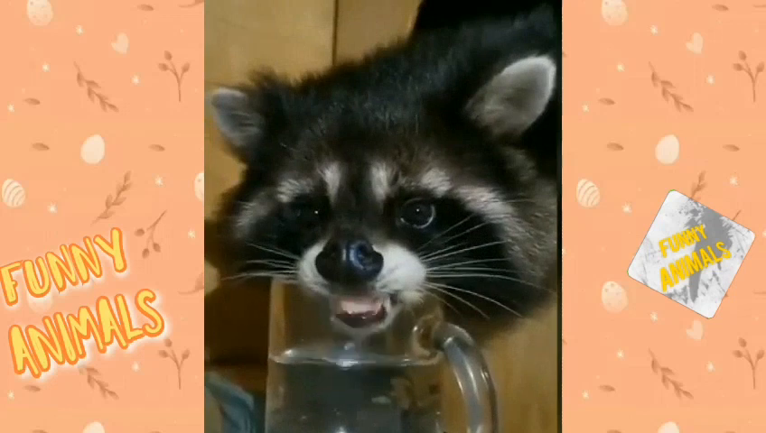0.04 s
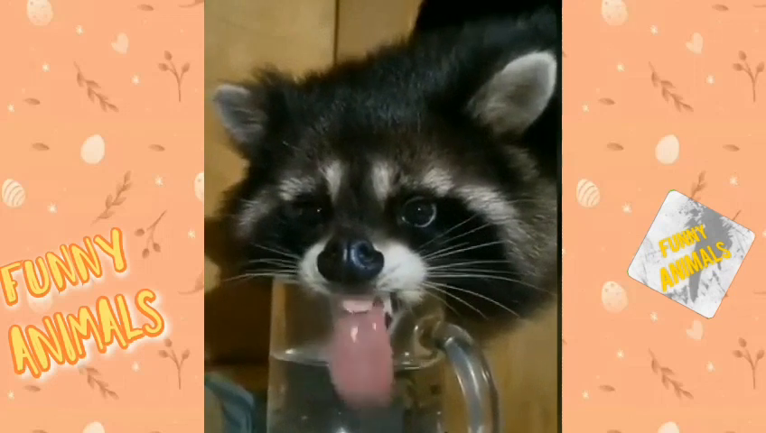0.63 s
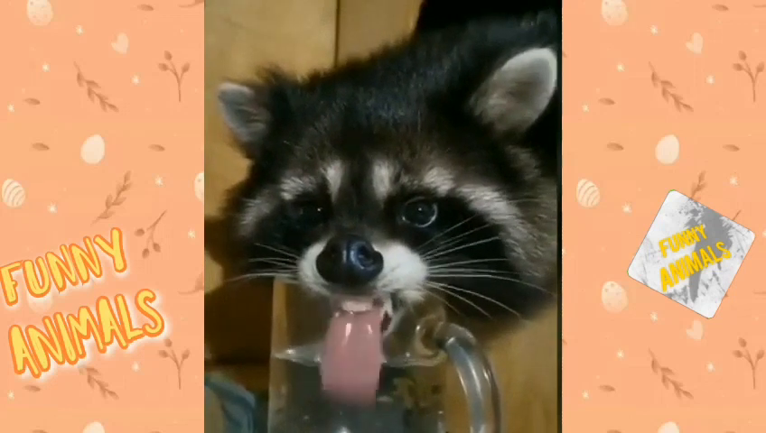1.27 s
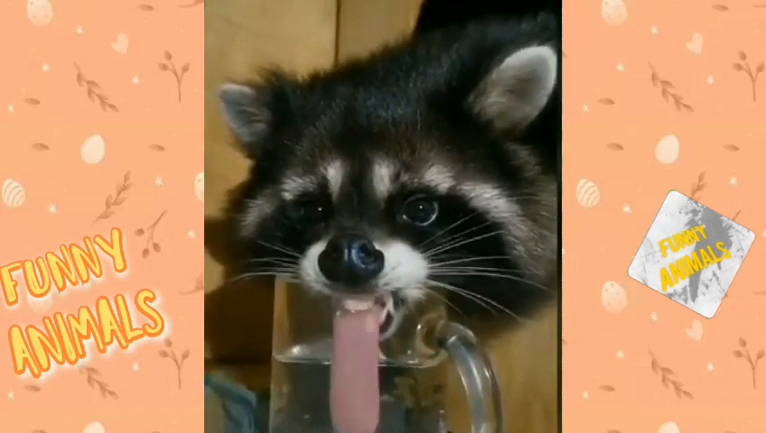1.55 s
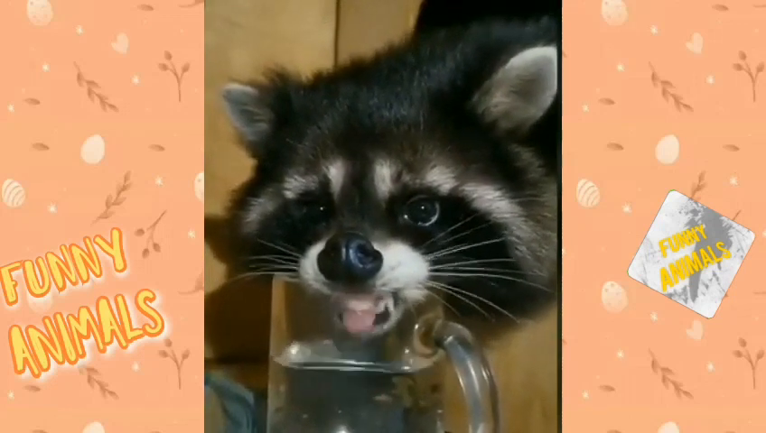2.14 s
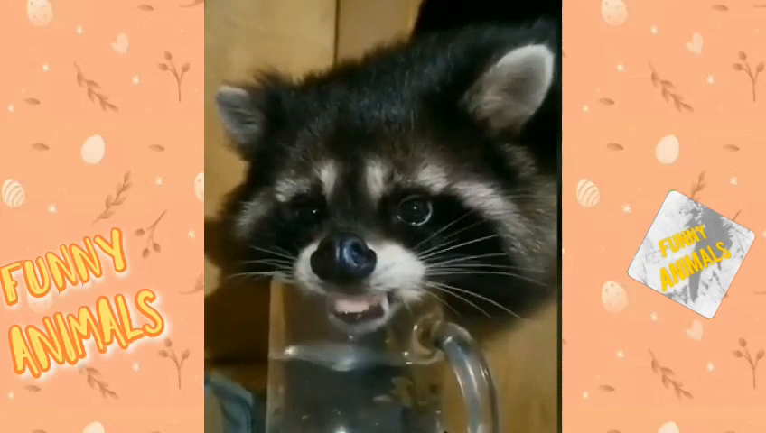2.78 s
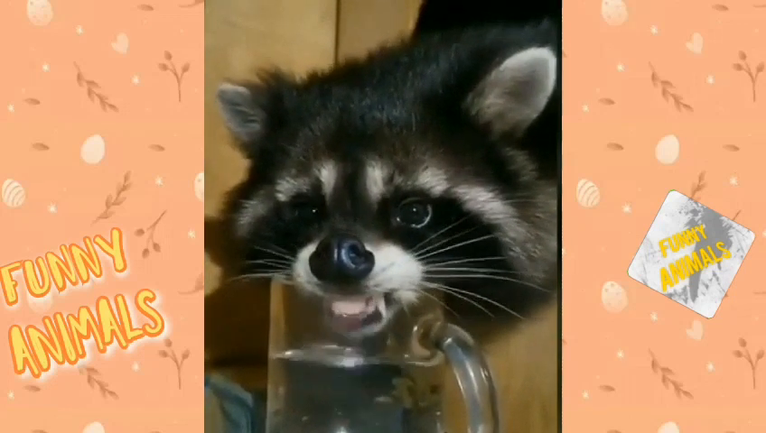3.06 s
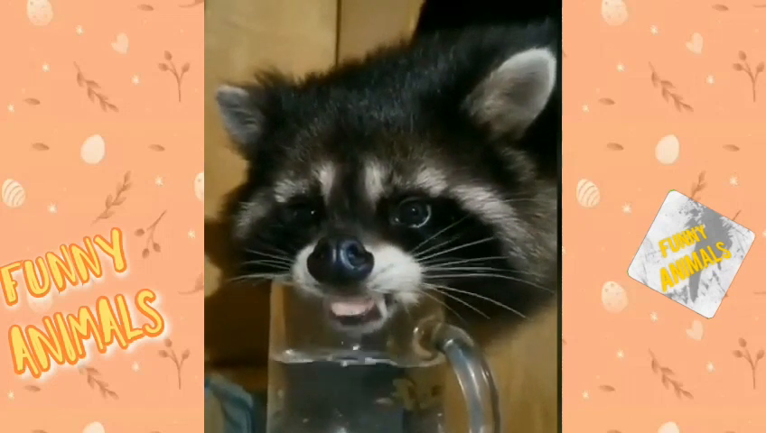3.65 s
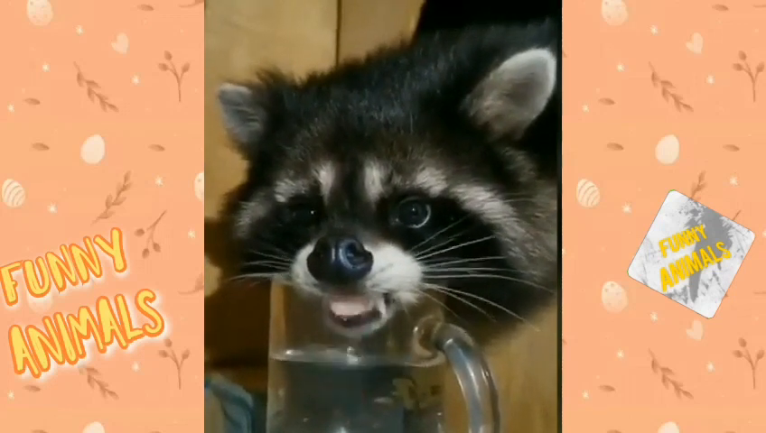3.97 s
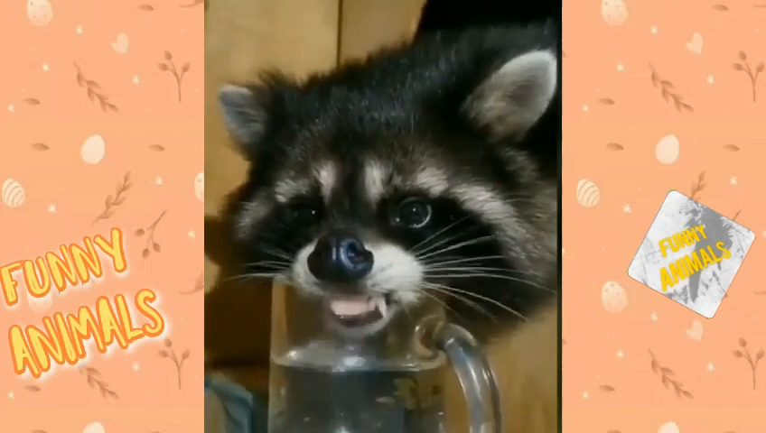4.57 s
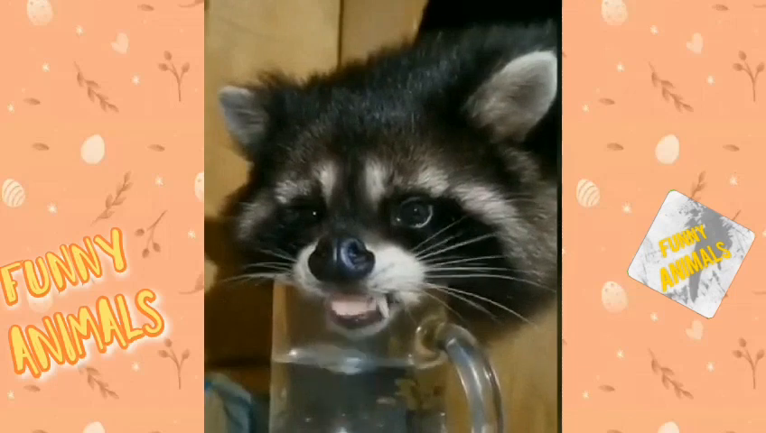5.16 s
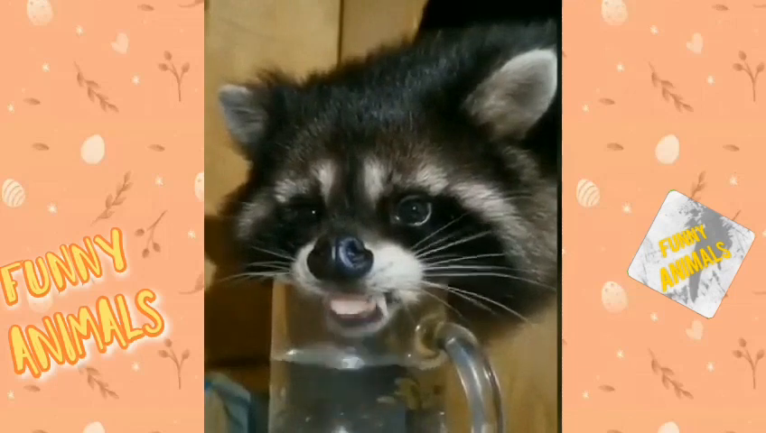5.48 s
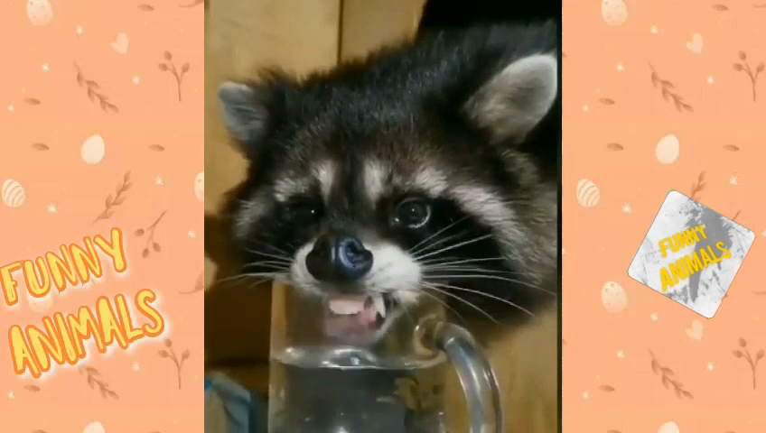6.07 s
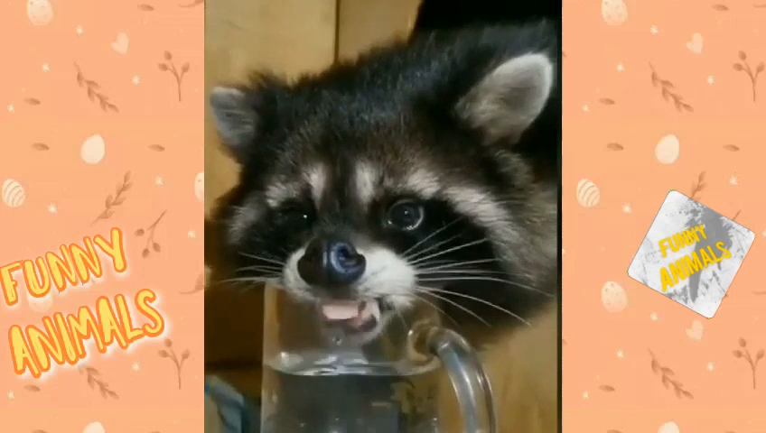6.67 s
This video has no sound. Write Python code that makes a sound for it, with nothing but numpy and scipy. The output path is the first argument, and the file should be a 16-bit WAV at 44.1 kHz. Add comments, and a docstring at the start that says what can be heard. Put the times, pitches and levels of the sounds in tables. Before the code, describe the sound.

A small room rumbles softly, with a hollow, burbling drone and faint dry ticks throughout. Heard up close, a raccoon starts drinking from a mug with scattered drips and little slurps, then laps, each lap a wet double smack with tiny bubble pings. The loudest slurp interrupts near the middle before quick, even lapping resumes. It finishes with several short, brushing hisses like fur against glass.

```python
"""A small room booms softly from the start, under a hollow, wavering drone and faint dry ticks.
Close up, a raccoon drinks from a glass mug: first a few wet pops, drops and fizzy slurps, then laps.
Each lap is a wet smack as the mouth opens and a lower one as it closes, with tiny bubbles pinging.
The lapping breaks off for the loudest slurp, near 3 s, then runs on at about three laps a second.
After 6 s come a few strokes of brushing hiss, like fur against the mug."""
import sys
import numpy as np
from scipy import signal
from scipy.fft import rfft, irfft, next_fast_len
from scipy.io import wavfile

SR = 44100
rng = np.random.default_rng(int(sys.argv[2]) if len(sys.argv) > 2 else 0)


def unload_wav(signal):
    """Save mono or channel-first audio to the path in sys.argv[1] as 16-bit WAV at rate SR, clipped to [-1, 1]."""
    wavfile.write(
        sys.argv[1],
        SR,
        np.round(np.clip(np.atleast_2d(signal).T, -1, 1) * 32767).astype(np.int16),
    )


N = 301138
TIME = np.arange(N) / SR
FREQ = np.fft.rfftfreq(next_fast_len(N, True), 1 / SR)

# tone of the room rumble: frequency_hz, relative_db
RUMBLE_SPECTRUM = [(15, -18.5), (42, -26.5), (58, -5), (125, -7.5), (175, -11.5), (270, -21), (450, -29),
                   (550, -42), (1000, -44), (1500, -52), (2500, -60.5), (5000, -64.5), (15000, -62)]
# room resonances booming out of it: centre_hz, width_hz, relative_db
ROOM_MODES = [(101.4, 23.6, -0.5), (202.7, 27.9, -7.5), (239.4, 24.5, -17.5), (322.6, 38, -20.5),
              (405.4, 33.4, -15.5), (458, 60, -26)]
# fader ride on the rumble's low end: time_s, level_db
RUMBLE_SWELL = [(0.0, -24.5), (0.32, -25), (0.38, -21), (0.42, -30), (0.48, -24), (1.03, -28), (2.03, -24),
                (2.24, -29.5), (2.28, -21), (2.34, -30.5), (2.59, -22), (2.61, -26.5), (3.42, -26.5),
                (6.83, -25.5)]
# fader rides on the drone's two resonances: time_s, lower_relative_db, upper_relative_db
DRONE_SWELL = [(0.0, -41, -41.5), (0.19, -42, -37.5), (0.7, -53, -46), (0.78, -39.5, -46.5),
               (0.95, -51.5, -41), (1.25, -38, -46.5), (1.27, -39, -40.5), (1.82, -50.5, -41),
               (2.02, -42, -62), (2.13, -56, -58), (2.24, -45.5, -47), (2.74, -49, -55.5), (3.06, -44, -44),
               (3.25, -62.5, -64), (3.44, -55, -40.5), (3.54, -41, -61), (3.59, -52, -40), (3.76, -58, -62),
               (3.92, -42.5, -47.5), (4.28, -62, -55), (4.35, -36, -37), (4.41, -40, -50),
               (4.55, -55.5, -45), (5.08, -40, -51), (5.27, -50, -43.5), (5.73, -44.5, -56.5),
               (5.78, -43, -45), (5.89, -55.5, -54), (6.28, -42.5, -56), (6.31, -46, -45), (6.45, -46, -59),
               (6.5, -65, -43.5), (6.62, -61, -62), (6.83, -50, -53)]
# glide of the drone's lower resonance: time_s, pitch_hz
DRONE_GLIDE = [(0.0, 772), (0.59, 862), (0.61, 771), (1.56, 862), (1.71, 728), (1.75, 894), (2.11, 752),
               (2.53, 893), (2.62, 783), (3.56, 794), (3.59, 900), (4.15, 785), (5.61, 864), (5.84, 695),
               (6.33, 873), (6.41, 697), (6.5, 815), (6.83, 702)]
# accented dry ticks: time_s, peak_db
TICK_ACCENTS = [(0.127, -27), (0.266, -25.5), (0.382, -22.5), (1.544, -24), (1.567, -26), (1.846, -24),
                (2.566, -25.5), (2.914, -22.5), (3.03, -27), (4.494, -27)]
# single wet pops and drops between the laps: time_s, pitch_hz, level_db
POPS_AND_DROPS = [(0.14, 2780, -57), (0.532, 2680, -51), (0.934, 2450, -59), (1.358, 2620, -48.5),
                  (2.55, 2500, -57.5), (2.865, 2480, -43.5), (3.48, 2480, -41.5), (3.735, 2780, -40),
                  (4.814, 2340, -39), (4.961, 2690, -43), (5.101, 2410, -40.5), (5.15, 2415, -45),
                  (5.393, 2300, -48.5), (5.704, 2365, -35.5), (5.734, 2360, -45.5)]
# slurps, splashes and a gulp: start_s, length_s, centre_hz, width_hz, level_db
SLURPS = [(0.706, 0.066, 10210, 700, -56.5), (1.114, 0.061, 11160, 1470, -43.5),
          (1.508, 0.016, 5800, 1100, -50), (1.908, 0.046, 11900, 700, -63),
          (2.144, 0.057, 2612, 770, -49.5), (2.218, 0.07, 3250, 320, -55), (2.802, 0.011, 9500, 2196, -54),
          (2.874, 0.047, 2600, 690, -32.5), (2.878, 0.055, 1805, 277, -46), (2.887, 0.056, 3360, 496, -46),
          (2.941, 0.12, 2620, 600, -45), (3.174, 0.057, 3090, 300, -39), (3.185, 0.03, 6350, 300, -60),
          (3.196, 0.083, 3460, 350, -41.5), (3.449, 0.05, 1244, 110, -46), (3.746, 0.008, 5900, 900, -56),
          (4.056, 0.013, 9420, 277, -44), (4.312, 0.096, 556, 266, -46.5), (4.545, 0.11, 5350, 348, -56),
          (4.569, 0.075, 3070, 354, -59), (4.658, 0.029, 10570, 423, -50.5), (5.869, 0.03, 5400, 255, -55),
          (6.118, 0.04, 5220, 378, -37), (6.127, 0.053, 9650, 826, -49.5), (6.186, 0.014, 5190, 350, -43)]
# lone bubbles: time_s, pitch_hz, relative_db
STRAY_BUBBLES = [(0.844, 8460, -60.5), (0.846, 10420, -58), (1.149, 7970, -59), (1.151, 8700, -57),
                 (1.34, 4710, -57), (2.806, 6610, -54.5), (3.585, 4700, -62), (3.698, 8170, -59),
                 (4.067, 8310, -61), (4.29, 4380, -49.5), (4.29, 9400, -61), (4.817, 9300, -60.5),
                 (5.828, 10510, -49)]
# laps: open_s, open_db, close_s, close_db, mouth_hz, settle_offset_db (from close_db),
# low_ping_db, middle_ping_db, high_ping_db (relative, on closing), opening_ping_offset_db
LAPS = [(1.156, -41.5, 1.218, -41, 2700, -14, -81, -68, -72, 8.5),
        (1.465, -54, 1.525, -36.5, 2716, -14, -57, -47.5, -51, -8.5),
        (1.773, -43, 1.822, -36, 2670, -4.5, -62, -57.5, -61, -20),
        (2.079, -58, 2.139, -50, 2700, -2, -54.5, -76, -63.5, -7.5),
        (3.41, -46, 3.45, -34.5, 2625, -18, -77, -62, -72, 1.5),
        (3.705, -46, 3.745, -30, 2610, -18, -70, -52.5, -48, -17),
        (3.993, -35.5, 4.07, -39.5, 2636, -12, -67, -64, -68, 4.5),
        (4.288, -39.5, 4.355, -38, 2610, -5.5, -62, -63, -76, 0),
        (4.651, -44, 4.722, -40.5, 2585, -15, -76, -76, -57.5, -7),
        (4.935, -37, 4.989, -37.5, 2620, -13, -74, -57, -53.5, -7.5),
        (5.226, -30, 5.261, -34, 2620, -7, -53.5, -74, -55.5, -10),
        (5.524, -36, 5.569, -35.5, 2660, -8.5, -54, -50, -51, -20),
        (5.827, -39, 5.876, -46.5, 2647, -6, -66, -69, -62, -11)]
# brushing strokes: peak_s, half_length_s, level_db
BRUSH_STROKES = [(6.267, 0.023, -46), (6.369, 0.027, -35.5), (6.5, 0.038, -42), (6.658, 0.028, -35.5),
                 (6.801, .022, -39)]
# resonances of the brushing hiss: centre_hz, width_hz, relative_db
BRUSH_MODES = [(1570, 570, -18), (2423, 230, 5.5), (3100, 1220, -4), (4250, 760, -3.5), (5270, 410, -3),
               (6580, 550, -1), (8080, 420, -7.5), (9800, 1350, -12)]


def undb(db):
    """Decibels to gain."""
    return 10 ** (np.asarray(db) / 20)


def unit(x):
    """Scale to an rms of 1."""
    return x / np.sqrt(np.mean(x ** 2) + 1e-20)


def curves(table):
    """Each column of a table as an automation curve, in straight lines from point to point."""
    times, *columns = np.transpose(table)
    return [np.interp(TIME, times, column) for column in columns]


def resonance(f, hz, width_hz):
    """Gain of a steep-sided resonance."""
    return 1 / np.sqrt(1 + (2 * (f - hz) / width_hz) ** 6)


def colour(x, gain):
    """Equalise with a gain for each frequency."""
    size = next_fast_len(N, True)
    return irfft(rfft(x, size) * gain, size)[:N]


def noise(gain, texture=1):
    """White noise, roughened by a texture envelope and then equalised."""
    return colour(texture * rng.standard_normal(N), gain)


def walk(rate_hz):
    """A smooth random wander with a spread of 1."""
    return unit(noise(np.exp(-(FREQ / rate_hz) ** 2)))


def bell(t, width_s):
    """A rounded swell and fade, peaking at t = 0."""
    return np.exp(-.5 * (t / width_s) ** 2)


def add(track, start_s, sound):
    """Mix a short sound into a track."""
    i = max(int(start_s * SR), 0)
    part = sound[:max(N - i, 0)]
    track[i:i + len(part)] += part


def rumble(steadiness=0.27, patchy_db=2.5):
    """Low noise booming in the room's resonances, with a thin steady hiss on top."""
    hz, db = np.transpose(RUMBLE_SPECTRUM)
    bed = noise(undb(np.interp(np.log(FREQ + 1), np.log(hz), db)))
    for mode_hz, width_hz, mode_db in ROOM_MODES:
        boom = noise(undb(mode_db) * resonance(FREQ, mode_hz, width_hz))
        hum = boom / np.abs(signal.hilbert(boom)) ** steadiness  # compressed towards an even hum
        flicker = undb(patchy_db * mode_hz / 200 * walk(10))  # higher resonances come and go more
        bed = bed + np.std(boom) * unit(hum * flicker)
    bed = unit(bed)
    level_db, = curves(RUMBLE_SWELL)
    low = colour(bed, resonance(FREQ, 0, 770))
    return low * undb(level_db) + (bed - low) * undb(level_db.mean())


def hollow_tone(hz, width_hz):
    """A narrow band of noise whose centre follows a moving pitch."""
    band = signal.hilbert(noise(resonance(FREQ, SR / 4, width_hz)))
    shift = np.exp(2j * np.pi * np.cumsum(hz - SR / 4) / SR)
    return unit((band * shift).real)


def drone(upper_centre_hz=1039.6, drift_hz=35.02, waver_hz=16, flutter_db=2.1):
    """A hollow, burbling drone: two gliding resonances swell separately among gurgles and a soft wash."""
    lower_db, upper_db = curves(DRONE_SWELL)
    lower_hz, = curves(DRONE_GLIDE)
    lower = undb(lower_db - 3.5) * hollow_tone(lower_hz + waver_hz * walk(12.8), width_hz=62)
    upper_hz = upper_centre_hz + drift_hz * walk(5) + waver_hz * walk(11.96)
    upper = undb(upper_db - 2.8) * hollow_tone(upper_hz, width_hz=103)
    wash = undb(-14) * unit(noise(resonance(FREQ, 990, 624) ** 2))
    swell = (undb(lower_db) + undb(upper_db)) / 2
    burble = swell * (undb(-1.8) * gurgles() + wash)
    return undb(flutter_db * walk(24)) * (lower + upper + burble)


def gurgles(low_hz=635, high_hz=1130, width_s=0.017, glide=1.27, spread_db=7, count=520):
    """Short hollow tones at random times, each bending up or down."""
    out, t = np.zeros(N), np.arange(-SR // 10, SR // 10) / SR
    for when, place, slope, size, span in rng.random(size=(count, 5)):
        hz = low_hz + (high_hz - low_hz) * place
        tone = np.cos(2 * np.pi * hz * (t + glide * (slope - .5) * t ** 2))
        envelope = undb(spread_db * size) * bell(t, width_s * (.5 + span))
        add(out, when * N / SR + t[0], envelope * tone)
    return unit(out)


def ticks(step_samples=1024):
    """Faint dry ticks on an even beat, about 43 a second, very unequal in strength; a few stand out."""
    out = np.zeros(N)
    beats = np.arange(step_samples // 2, N, step_samples)
    out[beats] = .0125 * np.clip(rng.laplace(size=len(beats)), -3, 3)
    for time_s, db in TICK_ACCENTS:
        add(out, time_s, undb([db]))
    return out


def pop(t, hz, width_s):
    """A soft wet pop: a few cycles of tone that swell and fade around t = 0."""
    return bell(t, width_s) * np.cos(2 * np.pi * (hz * t + rng.random()))


def smack(hz, spatter, scatter_hz, width_s, lead_s, trail_s=0.007):
    """A wet film tears: one main pop, 20 ms in, among small ones with the spatter share of the energy."""
    t = np.arange(-SR // 50, SR // 25) / SR
    small = np.zeros(len(t))
    for _ in range(12):
        at_s = trail_s * rng.exponential() - lead_s * rng.random()
        strength = rng.uniform(0.26, 1)
        small += strength * pop(t - at_s, hz + scatter_hz * rng.uniform(-0.97, 1), width_s)
    small *= 1 - np.exp(-(.5 * t / width_s) ** 2)  # ducked under the main pop
    main = pop(t, hz, width_s)
    wet = np.sqrt(1 - spatter) * unit(main) + np.sqrt(spatter) * unit(small)
    return wet / np.sqrt(3)  # the energy of 20 ms at an rms of 1


def pops_and_drops():
    """Single wet pops and drops between the laps, with little spatter."""
    out = np.zeros(N)
    for time_s, hz, db in POPS_AND_DROPS:
        wet = smack(hz, spatter=.25, scatter_hz=170, width_s=0.002, lead_s=0.0057)
        add(out, time_s - .02, undb(db) * wet)
    return out


def crackle(span_s=(.5, 6.1), pitch_hz=(7500, 13000), relative_db=(-76, -65), count=36):
    """Cues for faint saliva bubbles bursting at random: time_s, pitch_hz, relative_db."""
    low, high = np.transpose([span_s, pitch_hz, relative_db])
    return list(low + (high - low) * rng.random((count, 3)))


def bubbles(cues, scatter_hz=330, rise_s=0.0036, fall_s=0.014, trim_db=-1.5):
    """Each cue pings a tight cluster of bubbles of nearly one size, with a sharp snap at the cue's own pitch."""
    out, t = np.zeros(N), np.arange(-SR // 50, SR // 25) / SR
    swell = np.where(t < 0, bell(t, rise_s), np.exp(-np.abs(t) / fall_s))
    for time_s, hz, db in cues:
        pitches = hz + scatter_hz * rng.uniform(-0.438, 0.5, size=(6, 1))
        cluster = np.cos(2 * np.pi * (pitches * t + rng.random(pitches.shape))).sum(axis=0)
        snap = 0.4 * unit(pop(t, hz, width_s=0.00042))
        ping = unit(unit(swell * cluster) + snap)
        add(out, time_s + t[0], undb(db + trim_db) * ping)
    return out


def slurps(rise_s=0.011, fall_s=0.027, grain=0.19):
    """Water drawn between tongue and lips: a dense fizz of tiny bubbles, tuned by the narrow gap."""
    out, t = np.zeros(N), np.arange(SR // 4) / SR
    f = np.fft.rfftfreq(len(t), 1 / SR)
    for start_s, length_s, hz, width_hz, db in SLURPS:
        froth = rng.standard_normal(len(t))
        clumps = np.repeat(rng.standard_normal(len(t)), SR // 1000)[:len(t)]  # 1 ms grains
        froth *= np.exp(grain * clumps)
        fizz = unit(irfft(rfft(froth) * resonance(f, hz, width_hz), len(t)))
        flow = np.minimum(t / rise_s, 1) * np.exp(-np.maximum(t - length_s, 0) / fall_s)
        add(out, start_s - rise_s / 2, undb(db) * flow * fizz)
    return out


def laps(pitch_step=.028, settle_s=0.0192):
    """The mouth smacks high on opening, lower on closing, and again softly as the tongue settles."""
    out = np.zeros(N)
    for open_s, open_db, close_s, close_db, mouth_hz, settle_offset_db, *_ in LAPS:
        open_hz, close_hz = mouth_hz * (1 + pitch_step), mouth_hz * (1 - pitch_step)
        for time_s, hz, spatter, db in (
                (open_s, open_hz, 0.51, open_db),
                (close_s, close_hz, 0.3, close_db),
                (close_s + settle_s, close_hz, 0.69, close_db + settle_offset_db)):
            wet = smack(hz, spatter, scatter_hz=288, width_s=0.0014, lead_s=0.0065)
            add(out, time_s - .02, undb(db) * wet)
    return out


def lap_pings(pitches_hz=(4430, 6570, 10140), detune=0.0238, spray_detune=.1, spray_s=0.012, spray_db=-9):
    """Bubble cues: three sizes burst as the mouth opens and closes, each throwing off a weaker ping."""
    cues = []
    for open_s, _, close_s, _, _, _, *levels_db, opening_db in LAPS:
        for time_s, offset_db in (open_s, opening_db), (close_s, 0):
            for hz, db in zip(pitches_hz, levels_db):
                bend, spray_bend, delay = rng.uniform(-1, 1, size=3)
                spray_hz = hz * (1 + spray_detune * spray_bend)
                cues.append((time_s, hz * (1 + detune * bend), db + offset_db))
                cues.append((time_s + spray_s * abs(delay), spray_hz, db + offset_db + spray_db))
    return cues


def brushing(touch_s=6.13, touch_db=-57.5, grain=0.52, clump=0.29, sizzle_db=-12, shimmer_db=1.5):
    """Dense friction clicks in shimmering resonances: strokes swell out of a light, steady touch."""
    strokes = sum(undb(db) * bell(TIME - peak_s, half_s) for peak_s, half_s, db in BRUSH_STROKES)
    pressure = strokes + undb(touch_db) * (TIME > touch_s)
    grit = np.exp(grain * rng.standard_normal(N) + clump * walk(130))
    body = sum(undb(db + shimmer_db * walk(25)) * noise(resonance(FREQ, hz, width_hz), grit)
               for hz, width_hz, db in BRUSH_MODES)
    brightness = undb(sizzle_db) * pressure / pressure.max()  # a harder stroke is brighter
    sizzle = brightness * unit(noise(resonance(FREQ, 10070, 1540), grit))
    return (unit(body) + sizzle) * pressure


def room(dry, wet_db=-8, low_t60_s=0.29, high_t60_s=0.26, crossover_hz=4500, predelay_s=0.0041):
    """Small-room reverb: a short dense tail whose treble dies a little sooner."""
    t = np.arange(SR // 2) / SR
    tail = np.zeros(len(t))
    for band, t60_s in ("low", low_t60_s), ("high", high_t60_s):
        crossover = signal.butter(2, crossover_hz, band, fs=SR, output="sos")
        decay = np.exp(-np.log(1000) * t / t60_s) * (t > predelay_s)
        tail += decay * signal.sosfilt(crossover, rng.standard_normal(len(t)))
    return dry + undb(wet_db) * signal.fftconvolve(dry, tail / np.linalg.norm(tail))[:N]


def scene():
    """The mono mix: the raccoon in the room's reverb, over a bed of rumble, drone and ticks."""
    raccoon = laps() + pops_and_drops()
    raccoon += bubbles(list(STRAY_BUBBLES) + crackle() + lap_pings())
    raccoon += slurps() + brushing()
    return (room(raccoon) + rumble() + drone() + ticks())[None]


def record(dry, top_hz=15400):
    """A steep low-pass takes the air off the top."""
    return signal.sosfilt(signal.ellip(8, .2, 70, top_hz, fs=SR, output="sos"), dry)


dry = scene()
out = record(dry)
unload_wav(out)
```